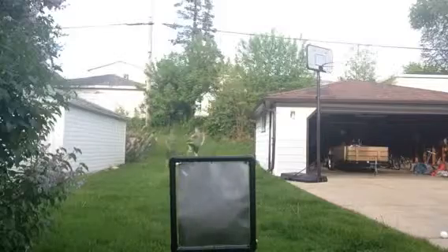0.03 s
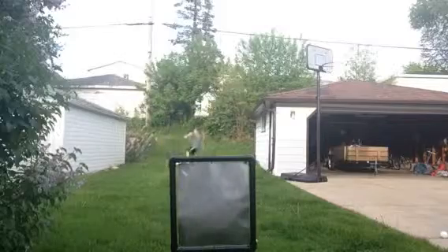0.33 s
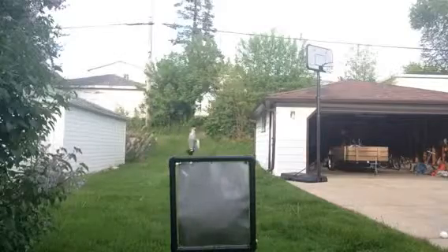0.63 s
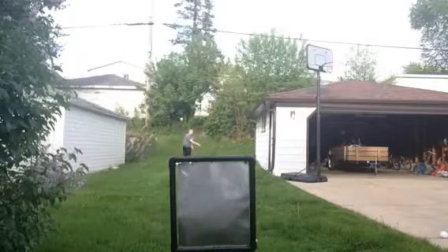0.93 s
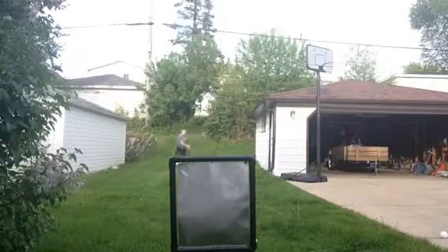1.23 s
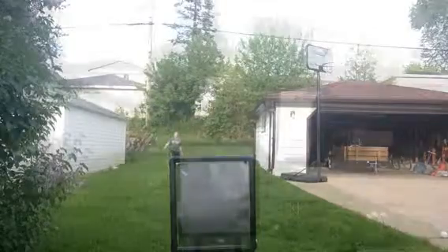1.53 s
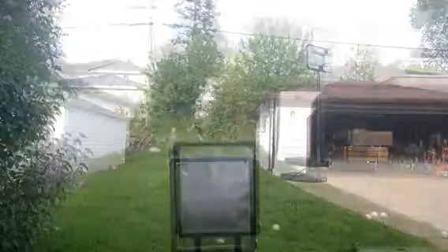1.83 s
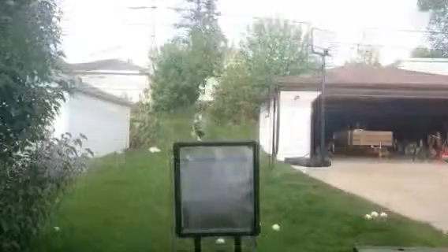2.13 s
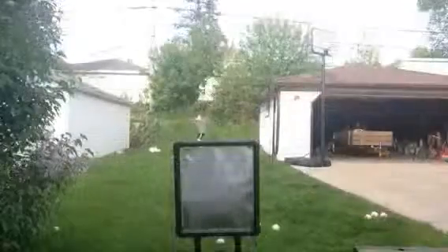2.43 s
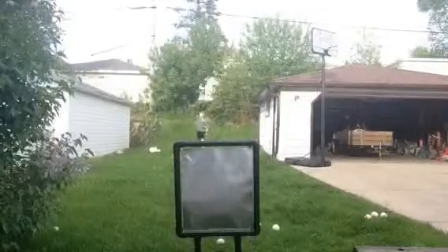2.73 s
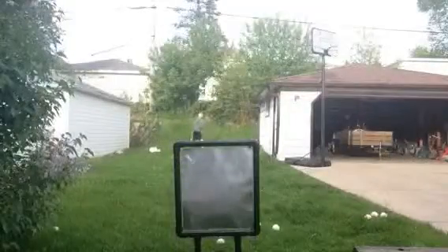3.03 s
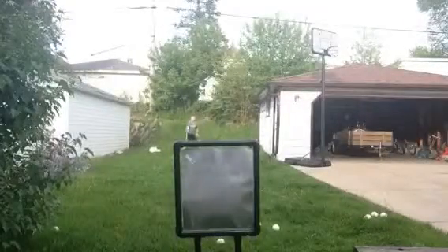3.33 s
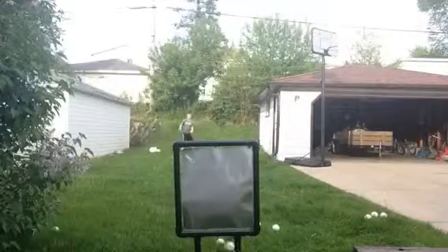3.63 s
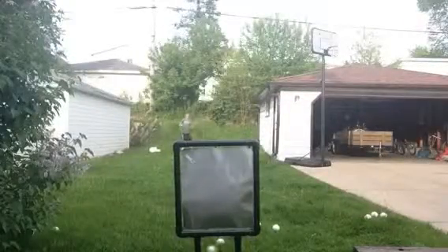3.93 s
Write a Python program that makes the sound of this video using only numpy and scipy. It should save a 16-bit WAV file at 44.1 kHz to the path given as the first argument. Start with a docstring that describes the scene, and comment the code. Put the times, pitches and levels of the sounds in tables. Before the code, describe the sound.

A ball crashing into a sheet target stands out in a quiet backyard with faint birdsong. First come quick knocks and a soft landing on grass, then a faint airy whistle and the loud, close hit, leaving the frame ringing.

```python
"""A framed sheet target booms, crashes and rings on as a perforated plastic ball slams into it close by.
Air whistles in the ball's holes as it crosses a quiet backyard. An earlier pitch knocks nearby,
brushes the grass and taps down. Songbirds carol over a low outdoor rumble."""
import sys
import numpy as np
from scipy import signal
from scipy.fft import rfft, irfft, next_fast_len
from scipy.io import wavfile
from scipy.ndimage import map_coordinates

SR = 44100
rng = np.random.default_rng(int(sys.argv[2]) if len(sys.argv) > 2 else 0)


def master_out(mix):
    """Clip the mix to full scale and print it as 16-bit PCM to the path in sys.argv[1]."""
    frames = np.transpose(np.atleast_2d(mix))
    ceiling = np.clip(frames, -1, 1)
    pcm = np.round(ceiling * 32767).astype(np.int16)
    wavfile.write(sys.argv[1], SR, pcm)


N = 176400
STRIKE_S = 3.4515

# Sheet pressure pulses: time_s, width_s, level_db
SHEET_PUSHES = [(3.4455, 0.0011, -17)]
SHEET_SNAPS = [(3.4528, 0.00045, -2), (3.4576, 0.00024, -9)]
# Graze spectrum: freq_hz, relative_db
GRAZE_SPECTRUM = [(60, -4), (500, -5.5), (1500, -14), (15000, -47.5)]
def sheet_boom(graze_s=3.429, graze_db=-32):
    """The ball grazes the sheet, which gives way and snaps back."""
    out, t = np.zeros(N), np.arange(N) / SR
    graze = noise(GRAZE_SPECTRUM, clock(STRIKE_S - graze_s))
    add(out, graze_s, amp(graze_db) * graze * np.linspace(.5, 1, len(graze)))
    for time_s, width_s, level_db in SHEET_PUSHES:
        out += amp(level_db) * bell(t - time_s, width_s)
    for time_s, width_s, level_db in SHEET_SNAPS:
        out += amp(level_db) * snap(t - time_s, width_s)
    return out


# Crash spectrum: freq_hz, relative_db
CRASH_SPECTRUM = [(35, -60.5), (60, -25.5), (185, -3.5), (376, -10), (497, -6.5), (1120, -5.5),
                  (1870, -6.5), (3340, -4), (9080, -17), (13500, -28), (15500, -33.5)]
# Crash build-up, hold and decay: freq_hz, duration_s
CRASH_RISE_S = [(200, 0.0044), (600, 0.024), (1500, 0.023), (4000, 0.037), (10000, 0.068)]
CRASH_HOLD_S = [(200, 0.035), (1000, 0.042), (4000, 0.056), (10000, 0.037)]
CRASH_T60_S = [(150, 0.23), (450, 0.53), (950, 0.69), (2000, 0.45), (4000, 0.39), (6500, 0.37),
               (12000, 0.25)]
# Sheet modes: pitch_hz, level_db
SHEET_MODES = [(207, -21), (416, -28), (580, -27), (637, -25), (962, -24), (1174, -26), (1414, -24),
               (1624, -26), (2085, -23), (2290, -20), (2865, -21), (3726, -19)]
def sheet_crash(crash_db=-11, lead_s=.0038):
    """The sheet's energy spreads upward into a crash; its modes die with it."""
    def envelope(hz, t):
        rise = np.minimum((t + lead_s) / along(CRASH_RISE_S, hz), 1)
        return rise * fade(t, along(CRASH_T60_S, hz), along(CRASH_HOLD_S, hz))

    out, t = np.zeros(N), clock(1)
    crash = amp(crash_db) * by_band(noise(CRASH_SPECTRUM, t), envelope)
    for pitch_hz, level_db in SHEET_MODES:
        rise = 1 - np.exp(-t / along(CRASH_RISE_S, pitch_hz))
        crash += rise * mode(t, pitch_hz, level_db, along(CRASH_T60_S, pitch_hz))
    add(out, STRIKE_S, crash)
    return out


# Frame modes: pitch_hz, level_db
FRAME_MODES = [(215.3, -46.5), (376.8, -53), (410, -49.5), (473.7, -53), (549, -48), (716, -48),
               (786, -47.5), (893.6, -43), (1130, -37.5), (1270, -47)]
# Dense weak modes: freq_hz, relative_db
SHIMMER_SPECTRUM = [(100, -19), (250, -3), (520, 1), (1100, 0), (2000, -11), (4000, -21.5), (15000, -57)]
def frame_ring(shimmer_db=-36.5, opening_gain_db=8.5):
    """The frame rings long, clear modes in a shimmer; it is also ringing as the scene opens."""
    def ring(t):
        clear = sum(mode(t, hz, db, t60_s=5.3 * (200 / hz) ** .61) for hz, db in FRAME_MODES)
        return clear + amp(shimmer_db) * fade(t, t60_s=2.22) * noise(SHIMMER_SPECTRUM, t)

    out, t = np.zeros(N), clock(1)
    add(out, STRIKE_S, ring(t))
    add(out, 0, amp(opening_gain_db) * ring(t + 1) * fade(t, t60_s=.19, hold_s=.27))
    return out


# Ball contacts: start_s, level_db, hold_s, t60_s, bass_db, treble_db
BALL_KNOCKS = [(1.551, -29.5, 0.0078, 0.025, -6, -2), (1.5598, -32.5, .0015, .03, 0, -0.5),
               (1.6286, -22, 0.0028, 0.013, 2, -0.5), (2.101, -51.5, .002, .02, -8, 6),
               (2.2915, -34.5, 0.0042, 0.023, -11, -8.5)]
# Knock spectrum: freq_hz, relative_db
KNOCK_SPECTRUM = [(60, -15), (170, 0), (370, -3.5), (520, -5.5), (750, -4.5), (1250, -1.5), (1800, -10),
                  (2600, -17), (3700, -13), (5000, -14), (7700, -16), (15000, -23)]
# Struck body modes: pitch_hz, relative_db, t60_s
BODY_MODES = [(194.3, -16.5, 0.33), (398, -16.5, .25), (1134, -16, 0.17), (1334, -14.5, 0.15)]
# Yard tail decay: freq_hz, t60_s
TAIL_T60_S = [(200, 0.26), (1200, 0.15), (5000, 0.2), (12000, 0.13)]
def knocks(click_db=3, click_width_s=.00008, tail_db=-6):
    """Hard contacts: a click, a burst and a short ring from the struck body, then the yard's tail."""
    out, t = np.zeros(N), clock(.63)
    for start_s, level_db, hold_s, t60_s, bass_db, treble_db in BALL_KNOCKS:
        tilt = [(350, bass_db), (1000, 0), (2000, 0), (6000, treble_db)]
        spectrum = [(hz, db + along(tilt, hz)) for hz, db in KNOCK_SPECTRUM]
        envelope = fade(t, t60_s, hold_s)
        burst = unit(noise(spectrum, t) * envelope) * np.sqrt(np.mean(envelope ** 2))
        tail = by_band(noise(spectrum, t), lambda hz, t: fade(t, along(TAIL_T60_S, hz)))
        click = amp(click_db) * snap(t - 2 * click_width_s, click_width_s)
        ring = sum(mode(t, hz, db + along(tilt, hz), ring_s) for hz, db, ring_s in BODY_MODES)
        add(out, start_s, amp(level_db) * (click + burst + ring + amp(tail_db) * tail))
    return out


# Thumps under the knocks, and a soft landing: time_s, pitch_hz, width_s, level_db
LOW_THUMPS = [(1.5611, 298, .0013, -26.5), (1.6303, 315, 0.0012, -16), (1.754, 113, 0.012, -40)]
def thumps():
    """The struck body gives way and shoves the air for a cycle or two."""
    out, t = np.zeros(N), np.arange(N) / SR
    for time_s, pitch_hz, width_s, level_db in LOW_THUMPS:
        out += amp(level_db) * bell(t - time_s, width_s) * np.cos(2 * np.pi * pitch_hz * (t - time_s))
    return out


# Grass contacts: start_s, level_db, rise_s, hold_s, t60_s
GRASS_BRUSHES = [(1.538, -49, 0.0051, 0.011, 0.084), (2.104, -45, 0.00087, 0.021, 0.18),
                 (2.246, -51, 0.038, 0.1, 0.025)]
# Swish spectrum: freq_hz, relative_db
GRASS_SPECTRUM = [(200, -1), (1000, -6), (3000, -2.5), (6500, -1.5), (9000, -11.5), (15000, -15.5)]
def grass(grain_db=1.6):
    """Grainy swishes of the ball through the blades."""
    out, t = np.zeros(N), clock(.5)
    for start_s, level_db, rise_s, hold_s, t60_s in GRASS_BRUSHES:
        blades = unit(noise(GRASS_SPECTRUM, t) * amp(grain_db * wobble(t, 376)))
        envelope = np.minimum(t / rise_s, 1) * fade(t, t60_s, hold_s)
        add(out, start_s, amp(level_db) * blades * envelope)
    return out


# Ball flights: start_s, end_s, base_db
BALL_FLIGHTS = [(1.021, 1.552, -52), (2.849, 3.448, -52.5)]
def ball_whistle(first_hz=1440, last_hz=1260, approach_db=8):
    """Air whistles in the ball's holes, louder as it nears and lower as it slows."""
    out = np.zeros(N)
    for start_s, end_s, base_db in BALL_FLIGHTS:
        t = clock(end_s - start_s)
        whistle = narrow_noise(t, np.linspace(first_hz, last_hz, len(t)), width_hz=330)
        level_db = base_db - approach_db * (1.5 - t / t[-1])
        add(out, start_s, amp(level_db) * whistle * signal.windows.tukey(len(t), .1))
    return out


# Chirps and one low coo: start_s, length_s, first_hz, middle_hz, last_hz, relative_db
BIRD_NOTES = [(0.08, 0.039, 4000, 3450, 3240, -54), (0.119, 0.039, 3400, 3100, 2740, -49.5),
              (0.223, 0.204, 5550, 5480, 5500, -66.5), (0.28, 0.049, 4750, 3360, 3230, -50.5),
              (0.355, 0.045, 4000, 4520, 5070, -58), (0.361, 0.049, 6400, 6900, 7000, -70),
              (0.417, 0.039, 4400, 4160, 3370, -50), (0.495, 0.043, 4100, 4370, 5070, -56),
              (0.502, .05, 6600, 6850, 6900, -71), (0.543, 0.036, 4700, 4080, 3300, -50),
              (0.609, 0.051, 4200, 4330, 4600, -57.5), (.615, 0.047, 6650, 6900, 7040, -69),
              (0.73, 0.056, 3600, 4170, 4800, -59), (0.872, 0.026, 3950, 4200, 4640, -57),
              (1.046, 0.28, 5920, 5760, 5660, -70), (1.359, 0.091, 2500, 3240, 3660, -45),
              (1.421, 0.044, 4450, 4550, 4540, -54.5), (1.422, 0.06, 6500, 6550, 6400, -63),
              (1.498, 0.058, 3600, 3350, 2600, -48), (1.585, 0.041, 4300, 4045, 3540, -46.5),
              (1.69, .11, 2650, 3254, 3630, -51.5), (1.722, 0.033, 4350, 4500, 4500, -49),
              (1.728, 0.042, 7100, 6750, 6550, -63), (1.832, 0.064, 3600, 3080, 2260, -53),
              (1.995, 0.11, 2400, 3050, 3400, -48), (2.217, 0.044, 3400, 3550, 3750, -54),
              (2.242, 0.12, 2380, 3140, 3460, -50), (2.235, 0.14, 660, 693, 683, -51),
              (2.367, 0.016, 3550, 3610, 3640, -47), (2.516, 0.047, 4200, 3670, 3000, -51),
              (2.58, 0.049, 2500, 2750, 2760, -48.5), (2.63, 0.022, 4600, 4040, 3770, -58.5),
              (2.662, 0.077, 3700, 3150, 2300, -49.5), (2.864, 0.044, 3350, 3370, 3370, -52.5),
              (2.912, .02, 5000, 4280, 3650, -53.5), (2.943, 0.046, 3350, 2910, 2350, -48),
              (3.782, 0.087, 4350, 3924, 2960, -44.5), (3.943, 0.085, 2500, 3114, 3210, -46.5)]
# Harsh falling call: start_s, length_s, first_hz, last_hz, width_hz
BIRD_RASP = (3.12, .24, 4600, 2850, 1000)
def birds(note_gain_db=-4.5, waver=.025, flutter_db=3.3, wall_db=-12, rasp_db=-61, reverb_db=-7.5):
    """Gliding whistles and one rasp, echoing between the buildings."""
    out = np.zeros(N)
    for start_s, length_s, first_hz, middle_hz, last_hz, relative_db in BIRD_NOTES:
        t = clock(length_s)
        glide = np.polyfit([0, .5, 1], [first_hz, middle_hz, last_hz], 2)
        pitch_hz = np.polyval(glide, t / length_s) * (1 + waver * wobble(t, 311))
        level_db = relative_db + note_gain_db + flutter_db * wobble(t, 90)
        note = amp(level_db) * signal.windows.tukey(len(t), .3) * np.sin(phase(pitch_hz))
        add(out, start_s, note)
        for delay_s in rng.uniform(.005, .035, size=2):
            add(out, start_s + delay_s, amp(wall_db) * note)
    start_s, length_s, first_hz, last_hz, width_hz = BIRD_RASP
    t = clock(length_s)
    rasp = narrow_noise(t, np.linspace(first_hz, last_hz, len(t)), width_hz)
    add(out, start_s, amp(rasp_db) * signal.windows.tukey(len(t), .3) * rasp)
    t = clock(.5)
    impulse = rng.standard_normal(len(t)) * fade(t, t60_s=.35)
    return out + amp(reverb_db) * signal.fftconvolve(out, impulse / np.linalg.norm(impulse))[:N]


# Background spectra: freq_hz, relative_db
RUMBLE_SPECTRUM = [(20, -26), (48, -4), (88, -2), (115, -10), (145, -3), (185, -8), (260, -22),
                   (600, -52.5)]
AIR_SPECTRUM = [(120, -22.5), (200, -2.5), (273, -10.5), (906, -7.5), (2500, -18.5), (3800, -23),
                (5490, -32), (15000, -58)]
HISS_SPECTRUM = [(3500, -24), (5500, 0), (7800, -2), (9000, -15), (12000, -23), (15000, -32)]
# Background levels: time_s, level_db
RUMBLE_DB = [(.15, -52), (.35, -56.5), (1.2, -54.5), (1.4, -50.5), (1.8, -50), (2.5, -56), (3.3, -57.5),
             (3.9, -49)]
AIR_DB = [(0, -57), (.5, -61), (.85, -59.5), (1.2, -56), (1.45, -52), (1.9, -56), (2.3, -55.5), (2.7, -60),
          (3.099, -58), (4, -57.5)]
HISS_DB = [(0, -79), (.93, -82.5), (.97, -70), (1.3, -84), (1.75, -81), (2.5, -100), (2.92, -75),
           (3.1, -83)]
def yard(hum_hz=90.7, hum_relative_db=-1.5):
    """Distant rumble with a hum that follows its level, soft moving air and a faint hiss."""
    t = np.arange(N) / SR
    hum = amp(hum_relative_db) * np.sin(2 * np.pi * hum_hz * t + .5 * wobble(t, 2.2))
    rumble = (hum + noise(RUMBLE_SPECTRUM, t)) * gain_curve(RUMBLE_DB, t)
    air = noise(AIR_SPECTRUM, t) * gain_curve(AIR_DB, t)
    hiss = noise(HISS_SPECTRUM, t) * gain_curve(HISS_DB, t)
    return rumble + air + hiss


def amp(db):
    """Decibels to gain."""
    return 10 ** (np.asarray(db) / 20)


def gain_curve(points, t):
    """Gain through (time_s, level_db) points."""
    return amp(np.interp(t, *np.transpose(points)))


def unit(x):
    """Scale to rms 1."""
    return x / np.sqrt(np.mean(x ** 2) + 1e-20)


def along(points, hz):
    """Interpolate (freq_hz, value) points on a log axis."""
    freq_hz, values = np.transpose(points)
    return np.interp(np.log(hz + 1), np.log(freq_hz + 1), values)


def clock(length_s):
    """Sample times from zero."""
    return np.arange(int(length_s * SR)) / SR


def add(out, start_s, x):
    """Mix x into out."""
    i = max(0, round(start_s * SR))
    out[i:i + len(x)] += x[:max(0, len(out) - i)]


def wobble(t, rate_hz):
    """Smooth random curve of rms 1."""
    knots = rng.standard_normal(int(t[-1] * rate_hz) + 4)
    return unit(map_coordinates(knots, [t * rate_hz]))


def filtered(x, response):
    """Filter x by the gain response(hz)."""
    size = next_fast_len(len(x) + 8192)
    return irfft(rfft(x, size) * response(np.fft.rfftfreq(size, 1 / SR)), size)[:len(x)]


def noise(spectrum, t):
    """Coloured noise of rms 1."""
    return unit(filtered(rng.standard_normal(len(t)), lambda hz: amp(along(spectrum, hz))))


def by_band(x, envelope):
    """Give each frequency of x its own envelope(hz, t)."""
    hz, t, bands = signal.stft(x, SR, nperseg=256)
    return signal.istft(bands * envelope(hz[:, None], t), SR)[1][:len(x)]


def fade(t, t60_s, hold_s=0):
    """Hold, then fall 60 dB per t60_s."""
    return amp(-60 * np.maximum(t - hold_s, 0) / t60_s)


def phase(hz):
    """Running phase of a pitch curve."""
    return 2 * np.pi * np.cumsum(hz) / SR


def narrow_noise(t, hz, width_hz):
    """Noise band round a moving pitch."""
    return wobble(t, width_hz) * np.cos(phase(hz)) + wobble(t, width_hz) * np.sin(phase(hz))


def mode(t, hz, db, t60_s):
    """Decaying sine, random phase."""
    return amp(db) * fade(t, t60_s) * np.sin(2 * np.pi * (hz * t + rng.random()))


def bell(t, width_s):
    """Gaussian pulse round t = 0."""
    return np.exp(-.5 * (t / width_s) ** 2)


def snap(t, width_s):
    """Sharp pressure dip between two small crests."""
    return ((t / width_s) ** 2 - 1) * bell(t, width_s)


def scene():
    """All sources in mono."""
    target = sheet_boom() + sheet_crash() + frame_ring()
    return (target + knocks() + thumps() + grass() + ball_whistle() + birds() + yard())[None]


def record(dry, top_hz=15600):
    """Clip at full scale, then low-pass."""
    return filtered(np.clip(dry[0], -1, 1), lambda hz: hz < top_hz)[None]


dry = scene()
out = record(dry)
master_out(out)
```